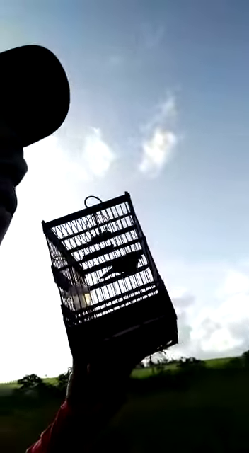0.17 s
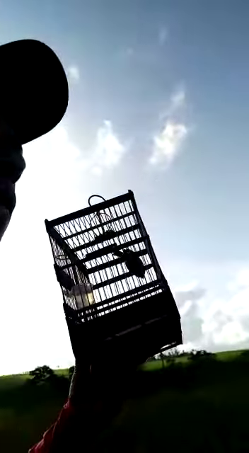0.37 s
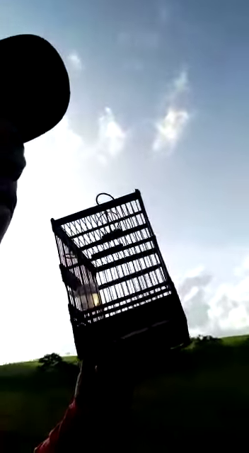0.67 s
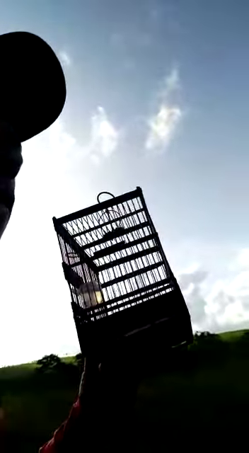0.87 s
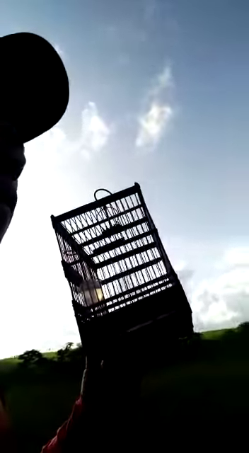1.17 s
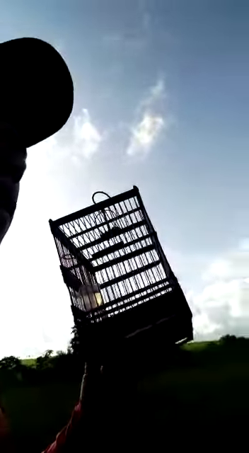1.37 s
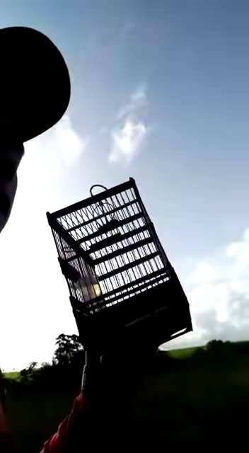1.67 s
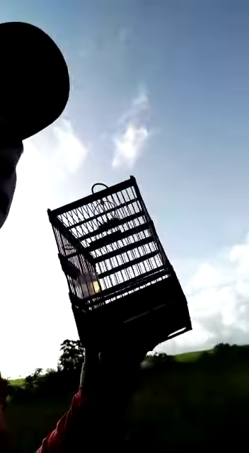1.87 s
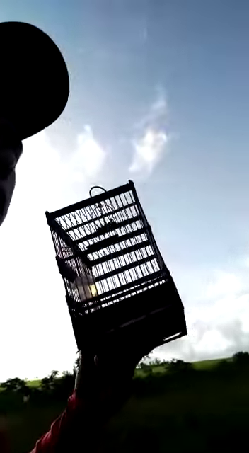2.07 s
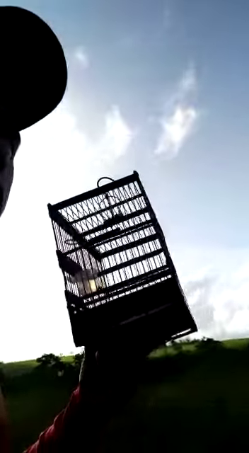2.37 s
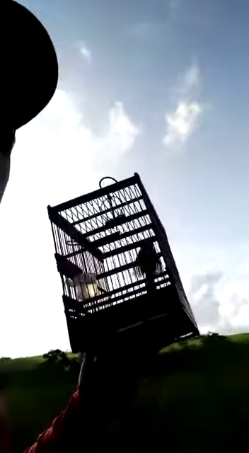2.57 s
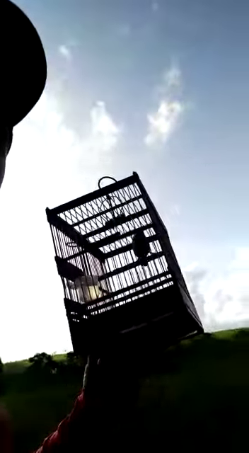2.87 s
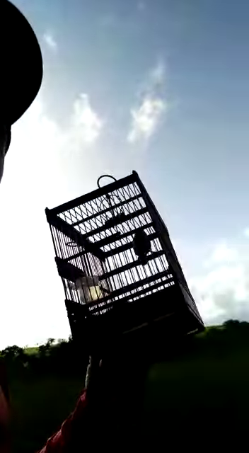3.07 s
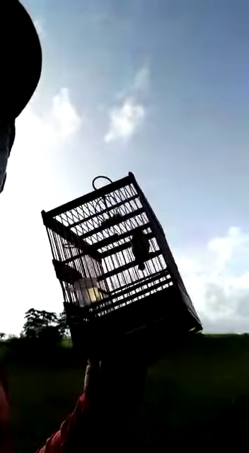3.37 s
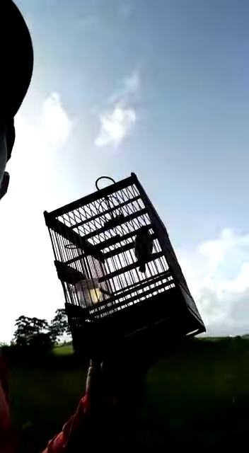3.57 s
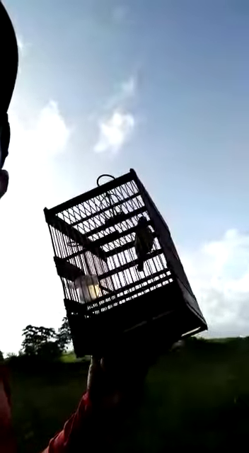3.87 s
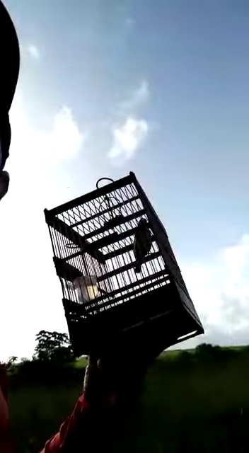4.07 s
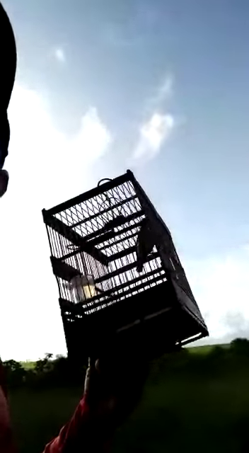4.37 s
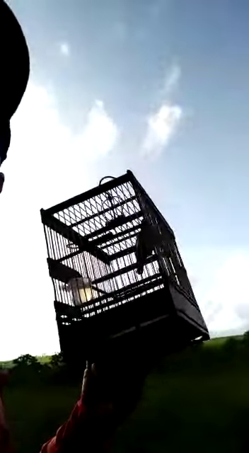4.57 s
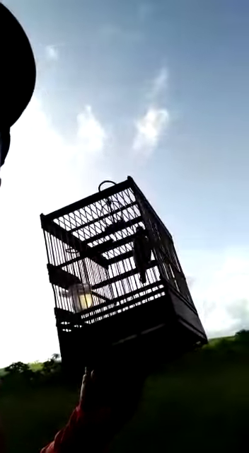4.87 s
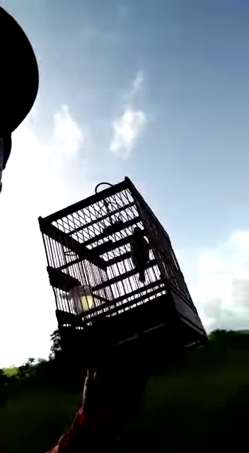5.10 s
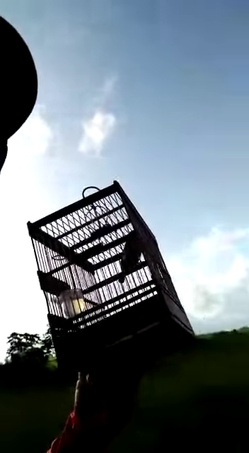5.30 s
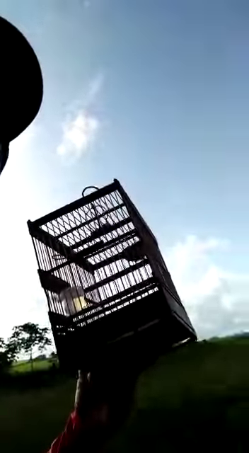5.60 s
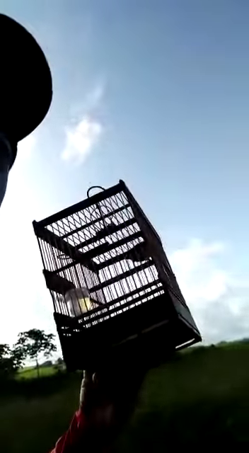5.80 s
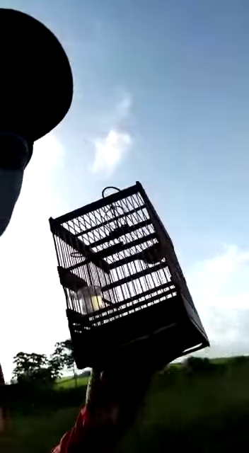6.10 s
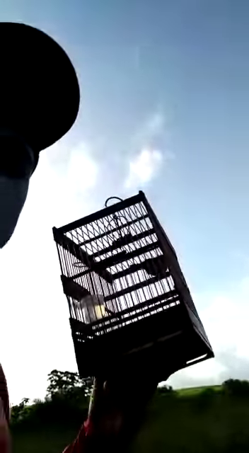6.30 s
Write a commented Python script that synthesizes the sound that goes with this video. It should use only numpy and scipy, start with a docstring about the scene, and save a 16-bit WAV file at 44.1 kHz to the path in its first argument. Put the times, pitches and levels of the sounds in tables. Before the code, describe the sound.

Someone carries a small wooden birdcage through grass in open air. Gentle irregular rustling, tiny stem cracks, low wind buffets and faint high insect chirps fill the first half. Then the bird, very near the microphone, sings five piercing pure whistles falling in pitch, far louder than everything else. Afterwards feathers flutter in quick soft beats, claws tick the cage, and a woody landing knock ends it.

```python
"""A meadow: a finch in a small wooden cage, carried close to a phone, whistles five notes that each end lower,
then flutters and lands. Whistles are gliding near-sines; claw blows ring decaying wood modes; wing beats are
air thumps with feather noise. Grass swishes as coloured noise under the carrier's steps and stalks snap as
short rings; wind puffs low noise on the microphone ports; crickets chirp as gliding tones over a far hiss."""
import sys
import numpy as np
from scipy import signal
from scipy.fft import rfft, irfft
from scipy.io import wavfile
from scipy.ndimage import uniform_filter1d

SR = 44100
rng = np.random.default_rng(int(sys.argv[2]) if len(sys.argv) > 2 else 0)


def natural_amplitude(level_db):
    """Convert a level in decibels to a linear amplitude factor, elementwise."""
    exponent = np.asarray(level_db, float) / 20
    return 10 ** exponent


def master(y):
    """Save y as 16-bit WAV."""
    cut = np.clip(np.atleast_2d(y).T, -1, 1)
    pcm = np.round(cut * 32767)  # scale
    wavfile.write(sys.argv[1], SR, pcm.astype(np.int16))


N = 284180


def curve(table):
    """Columns of a table whose first column is seconds, one value a sample."""
    s, *columns = np.transpose(table)
    return [np.interp(np.arange(N) / SR, s, c) for c in columns]


def pan(db):
    """Left and right gains for a left-minus-right level."""
    return natural_amplitude(np.array([db, -db]) / 2)


def noise(spectrum):
    """Noise of rms 1 with a colour given as (Hz, relative density in dB)."""
    hz, db = np.transpose(spectrum)
    log_hz = np.log(np.fft.rfftfreq(N, 1 / SR) + 1)
    gain = natural_amplitude(np.interp(log_hz, np.log(hz), db, -80, -80))
    x = irfft(rfft(rng.standard_normal(N)) * gain, N)
    return x / x.std()


def walk(rate_hz):
    """Random levels held 1 / rate_hz seconds and slewed twice; spread near 1."""
    hold = int(SR / rate_hz)
    steps = np.repeat(rng.standard_normal(N // hold + 1), hold)
    return 1.15 * uniform_filter1d(uniform_filter1d(steps, hold), hold)[:N]


def ring(hz, t60_s, length_s=.08):
    """One mode, decaying 60 dB in t60_s."""
    t = np.arange(int(length_s * SR)) / SR
    return np.sin(2 * np.pi * hz * t) * np.exp(-np.log(1000) * t / t60_s)


def bell(s, half_s):
    """Gaussian bump of height 1 at s, down to 1 / e half_s away."""
    return np.exp(-((np.arange(N) / SR - s) / half_s) ** 2)


def swell(s, rise_s, fall_s):
    """A bell-shaped rise to time s, then an exponential fall."""
    t = np.arange(N) / SR - s
    return np.where(t < 0, np.exp(-(t / rise_s) ** 2), np.exp(-np.maximum(t, 0) / fall_s))


def add(out, s, sound):
    """Mixes a short stereo sound in at time s."""
    i = int(s * SR)
    sound = sound[:, :N - i]
    out[:, i:i + sound.shape[1]] += sound


def ports(make, alike):
    """Partly alike left and right; the shared part arrives later on the right."""
    lag_samples = 18
    shared = make()
    alike = np.clip(alike, 0, 1)
    pair = (shared, np.roll(shared, lag_samples))
    return np.array([np.sqrt(alike) * x + np.sqrt(1 - alike) * make() for x in pair])


def song():
    """Near-sine whistles with faint overtones; an unsteady quick warble roughens the fast slides."""
    # One list a voice entry, two overlap in the first note. Each row: time in seconds, pitch in Hz,
    # rms level on the right in dB.
    notes = [
        [(3.785, 4560, -56), (3.792, 4430, -48), (3.808, 4440, -40), (3.849, 4270, -24.5), (3.862, 4080, -22),
         (3.873, 3650, -23), (3.878, 3500, -40)],
        [(3.869, 4800, -40), (3.874, 4550, -27), (3.881, 4130, -24.5), (3.892, 4120, -27), (3.916, 3940, -22.6),
         (3.968, 3840, -19), (4.018, 3840, -15.3), (4.092, 3640, -13.8), (4.107, 3580, -18.7),
         (4.115, 3630, -31.5)],
        [(4.226, 4660, -42), (4.231, 4850, -33.5), (4.239, 5660, -27), (4.247, 5880, -26.3), (4.267, 5720, -22),
         (4.31, 5690, -16.5), (4.353, 5570, -15), (4.362, 5240, -16.8), (4.373, 5200, -16),
         (4.381, 4910, -13.5), (4.389, 4890, -14.2), (4.395, 4620, -14.4), (4.404, 4620, -13.5),
         (4.411, 4310, -19), (4.429, 4150, -16.3), (4.455, 4040, -17.4), (4.481, 4040, -18.4),
         (4.489, 4090, -22.7), (4.494, 4150, -33.6)],
        [(4.63, 4900, -42), (4.64, 4710, -26), (4.653, 4430, -18.6), (4.678, 4080, -14), (4.692, 3890, -16.3),
         (4.712, 3630, -13.5), (4.76, 3270, -14), (4.78, 3140, -16), (4.847, 3010, -20.8), (4.859, 2950, -27.6),
         (4.866, 2900, -42)],
        [(4.918, 4410, -39), (4.925, 4530, -25), (4.942, 4450, -14.6), (4.964, 4180, -13.6),
         (4.987, 3940, -15.7), (5.022, 3650, -13.8), (5.063, 3400, -13.7), (5.121, 3390, -15),
         (5.128, 3340, -20), (5.132, 3520, -32.6)],
        [(5.205, 5930, -44), (5.215, 5830, -30.4), (5.23, 5670, -23.5), (5.248, 5750, -20.3),
         (5.272, 5460, -23), (5.283, 5890, -16.5), (5.291, 5480, -22), (5.314, 5300, -18.5), (5.323, 4950, -16),
         (5.345, 4540, -13.8), (5.359, 4220, -17.6), (5.385, 4100, -14.4), (5.411, 4090, -17.4),
         (5.419, 4180, -23), (5.423, 4180, -36.4)],
    ]
    # How the bird faces, a row a voice entry: left minus right in dB, overtone level in dB.
    facing = [(-7, -6), (-10, -6), (-0.5, -4.5), (-1.5, -2.5), (-0.5, 0), (3.5, 0)]
    # The hand shades the left port by pitch. Each row: pitch in Hz, left minus right in dB.
    left_shade = [(2950, -14), (3100, -19), (3420, -29.5), (3640, -15), (3920, -9.5), (4150, -5.5),
                  (4450, -12.5), (4800, -15), (5200, -8.5), (5600, -4), (5900, -12.5)]
    # The left port hears the bird round the hand. Each row: pitch in Hz, left phase lead in radians.
    left_lead = [(3000, 2.9), (3450, 1.5), (3800, -.4), (4400, -1.6), (5200, -.6), (5800, -1.7)]
    # Multiples 2, 3, 4 at full effort. Each row: right level in dB, left level in dB.
    overtones = [(-58, -66), (-59, -67), (-72, -77)]
    # Buzzes on the fast slides. Each row: middle in seconds, half length in seconds, warble in Hz rms.
    buzzes = [(4.37, .036, 180.3), (5.254, .03, 50.2), (5.306, 0.028, 242)]
    # Hoarse cracks of the voice. Each row: middle in seconds, half length in seconds, level in dB.
    rasps = [(3.873, .002, -47), (4.231, .006, -44), (5.131, .003, -50)]
    # Echoes off cage, carrier and ground. Each row: delay in seconds, level in dB.
    echoes = [(.0021, -26), (.0046, -28), (.0075, -31), (.0155, -34), (.023, -41), (.031, -44), (.043, -47)]
    calm_warble_hz, quiet_warble_hz_per_db = 8, 0.1  # warble widens slightly as the level falls
    fade_total_s = 0.0045

    out = np.zeros((2, N))
    wobble = noise([(60, -10), (150, -6), (273, 0), (443, -12)])
    flutter = noise([(50, 0), (120, 0), (500, -10)])
    air = noise([(8000, -15.0), (9500, -1.5), (12000, -1), (15000, -3.5)])
    buzz_hz = sum(hz * bell(s, half_s) for s, half_s, hz in buzzes)
    for note, (turn_db, bright_db) in zip(notes, facing):
        span = slice(int(note[0][0] * SR), int(note[-1][0] * SR))
        hz, db = (c[span] for c in curve(note))
        pan_db = turn_db + np.interp(hz, *np.transpose(left_shade))
        lead_rad = np.interp(hz, *np.transpose(left_lead))
        warble_hz = calm_warble_hz + buzz_hz[span] - quiet_warble_hz_per_db * (db - db.max())
        swing_hz = 1.6 * warble_hz * np.tanh(.8 * wobble[span])  # the swing has a limit
        phase = 2 * np.pi * np.cumsum(hz + swing_hz) / SR
        # cage and hand colour each path: a pitch swing also swings the level, oppositely at the two ports
        left_swing = 1 + .7 * np.tanh(.002 * swing_hz + .003 * warble_hz * flutter[span])
        right_swing = 1 + .5 * np.tanh(-.0012 * swing_hz + .003 * warble_hz * flutter[::-1][span])
        left = natural_amplitude(db + pan_db) * left_swing * np.sin(phase + lead_rad)
        right = natural_amplitude(db) * right_swing * np.sin(phase)
        for k, (right_db, left_db) in enumerate(overtones, 2):
            # overtones grow slowly with effort, waver, and the beak passes less between 9 and 12 kHz
            beak_db = np.interp(k * hz, [6500, 8500, 10000, 11500, 12500, 15500, 16000],
                                [7, 0, -4, -5, 2, 4, -60])
            overtone = natural_amplitude(.4 * (db + 14) + bright_db + beak_db + 2.5 * walk(30)[span])
            right += overtone * natural_amplitude(right_db) * np.sin(k * phase)
            left += overtone * natural_amplitude(left_db) * np.sin(k * phase + k)
        # air through the beak hisses faintly with the note
        right += natural_amplitude(0.52 * db - 70) * air[span]
        left += natural_amplitude(1.1 * db - 71) * air[::-1][span]
        fade = signal.windows.tukey(len(hz), fade_total_s * SR / len(hz))
        out[:, span] += np.sqrt(2) * fade * np.array([left, right])  # sqrt(2): rms to peak

    rasp = sum(natural_amplitude(db) * bell(s, half_s) for s, half_s, db in rasps)
    rasp = rasp * noise([(2600, -13.5), (3400, 1), (6500, -6.5), (7800, -17)])
    out += natural_amplitude(np.array([[-8], [0]])) * rasp
    echo = sum(natural_amplitude(db) * np.roll(out[1], int(s * SR)) for s, db in echoes)
    return out + echo * np.array([[natural_amplitude(-14.0)], [1]])


def cage():
    """A claw blow rings the wooden frame: low modes are the floor panel, high ones the perch; wires tick."""
    # Claws on wood. Each row: start in seconds, panel, perch and wire tick drive in dB, left minus right in dB.
    knocks = [(5.2199, -39.5, -22, -27, 31), (5.2297, -37.5, -70, -86, 20), (5.284, -39, -29.5, -62.5, 10),
              (5.359, -43, -74, -86.5, 9), (5.759, -49, -34.5, -77, 21), (6.3078, -23.5, -10, -82, 16)]
    # Each row: mode in Hz, relative level in dB, t60 in seconds.
    modes = [(370, 0, .022), (738, -3, .012), (1410, -15, .007), (2500, 0, .008), (3300, -7, .004)]
    tick_decay_s, right_lag_samples = 0.00086, 8
    out = np.zeros((2, N))
    contact = np.convolve(np.hanning(13), np.hanning(13)) / 20  # a soft push of .5 ms
    tick_band = signal.butter(1, [2500, 6000], "band", fs=SR, output="sos")
    for s, panel_db, perch_db, tick_db, pan_db in knocks:
        blow = sum(natural_amplitude(db + (perch_db if hz > 1000 else panel_db)) * ring(hz, t60_s)
                   for hz, db, t60_s in modes)
        tick = signal.sosfilt(tick_band, rng.standard_normal(len(blow)))
        tick *= np.exp(-np.arange(len(blow)) / (tick_decay_s * SR))
        left = np.convolve(blow, contact)[:len(blow)] + natural_amplitude(tick_db) * tick
        right = natural_amplitude(-pan_db) * np.roll(left, right_lag_samples)
        add(out, s, np.array([left, right]))
    # a small box radiates little deep bass
    return signal.sosfilt(signal.butter(1, 170, "high", fs=SR, output="sos"), out)


def wings():
    """Each beat pushes a soft thump of air and a swish of feathers, a little uneven."""
    # Flurries. Each row: first beat in seconds, beats (rounded down), thump and feather swish drive in dB.
    flurries = [(5.655, 5.4, -55, -58.5), (5.852, 4, -55.5, -57), (6.055, 3, -44.5, -57.5)]
    beat_s, pan_db = .038, 13
    out, t = np.zeros((2, N)), np.arange(int(.04 * SR)) / SR
    feathers = noise([(600, 9), (1300, -2.5), (2700, 5), (5000, -14)])
    thump = np.sin(2 * np.pi * 300 * t) * t / 0.0017 * np.exp(1 - t / 0.0019)
    swish_shape = t / .0045 * np.exp(1 - t / .0045)
    for first_s, beats, thump_db, swish_db in flurries:
        for k, uneven in enumerate(rng.standard_normal((int(beats), 3))):
            s = first_s + k * beat_s + .0015 * uneven[2]
            swish = feathers[int(s * SR):][:len(t)] * swish_shape
            beat = natural_amplitude(thump_db + 0.83 * uneven[0]) * thump + natural_amplitude(swish_db + 1.4 * uneven[1]) * swish
            add(out, s, np.outer(pan(pan_db), beat))
    return out


def grass():
    """Blades swish and crackle with each step; dry stems brush past and the loudest stalks snap singly."""
    # Each row: step in seconds, swish in dB ahead of grain and waver, low rustle in dB ahead of waver.
    steps = [(0.0, -56.5, -59.5), (0.28, -62.5, -66), (0.82, -66.5, -71.5), (0.97, -61, -76.5),
             (1.118, -57.5, -66), (1.358, -62, -68), (1.822, -61.5, -66.5), (2.112, -58, -61),
             (2.45, -68.5, -72.5), (2.72, -85, -73.5), (2.952, -63, -71.5), (3.228, -59.5, -68.5),
             (3.922, -68, -65), (4.14, -60, -61.5), (4.551, -68, -74.5), (4.88, -61.5, -63.5),
             (5.2, -60, -77.5), (5.38, -57.5, -60), (5.55, -65, -66.5), (5.78, -63, -66.5),
             (5.951, -57.5, -61.5), (6.398, -63.5, -58.5)]
    # Colours. Each row: Hz, relative density in dB.
    swish_colour = [(700, -24), (900, -4.5), (1200, -2.5), (1750, -2.5), (2700, -1.5), (3700, -1),
                    (4700, -9), (6000, -9), (7500, -21), (8200, -41)]
    rustle_colour = [(120, -38), (200, -15.5), (292, -3), (464, -0.5), (787, -1.5), (1100, -22),
                     (1430, -53.5), (2420, -120)]
    # Dry stems brushing past. Each row: middle in seconds, half length in seconds, level in dB ahead of grain.
    brushes = [(0.045, .05, -61), (1.094, .06, -74), (2.97, .035, -62), (3.208, .03, -64.5),
               (4.138, .02, -61), (4.888, .03, -64), (5.773, .03, -73.5), (6.083, .05, -62.5)]
    # Stalks snapping, plus a click as the bird's note ends near 4.49 s. Each row: time in seconds, drive in dB,
    # main mode in Hz, left minus right in dB.
    snaps = [(0.0598, -40, 3000, -10), (0.2876, -46, 2030, 4), (0.6401, -47.5, 2400, -2),
             (0.6803, -42, 3040, -11), (0.7146, -50, 1760, 3.5), (0.9728, -41, 1960, 5),
             (1.09, -44, 2000, 0), (2.9182, -40, 3050, -2), (2.9796, -38, 3050, -1.5),
             (3.308, -41.5, 2500, -0.5), (3.3827, -51, 1910, 9), (3.5339, -42, 2520, -1),
             (4.162, -42, 4400, -1), (4.4887, -44.5, 3300, -10.5)]
    rise_s, fall_s, still_swish_db, still_rustle_db = .12, 0.2, -80, -79.5

    shapes = [swell(s, rise_s, fall_s) for s, _, _ in steps]
    swish_steps = [natural_amplitude(db) * shape for (_, db, _), shape in zip(steps, shapes)]
    rustle_steps = [natural_amplitude(db) * shape for (_, _, db), shape in zip(steps, shapes)]
    swish = natural_amplitude(still_swish_db) + np.max(swish_steps, axis=0)
    rustle = natural_amplitude(still_rustle_db) + np.max(rustle_steps, axis=0)
    # sparse larger grains on top of the dense swish
    grain_db = 3.5 * np.minimum(rng.exponential(size=N // 64 + 1), 5)
    grain = uniform_filter1d(natural_amplitude(grain_db).repeat(64)[:N], 64)
    grain = 0.8 + 0.85 * grain / np.sqrt(np.mean(grain ** 2))
    out = swish * natural_amplitude(2.0 * walk(25)) * grain * ports(lambda: noise(swish_colour), 0.74)
    out += rustle * natural_amplitude(2.0 * walk(6.6)) * ports(lambda: noise(rustle_colour), 0.66)

    brush = sum(natural_amplitude(db) * bell(s, half_s) for s, half_s, db in brushes)
    brush_colour = [(2500, -12.5), (4000, 4), (8000, -6.0), (15700, -14.5)]
    out += brush * grain * ports(lambda: noise(brush_colour), 0.44)
    for s, db, hz, pan_db in snaps:
        stalk = ring(hz, 0.005, .02) + 0.25 * ring(0.65 * hz, 0.004, .02)
        snap = np.convolve(stalk, np.hanning(7) / 3)  # softened onset
        add(out, s + 0.0018, natural_amplitude(db) * np.outer(pan(pan_db), snap))
    return out


def wind():
    """Turbulent puffs, mostly unrelated at the two ports, swell with each gust; eddies pop on the right."""
    # Each row: peak in seconds, level in dB ahead of flutter, fall time constant in seconds,
    # left minus right in dB.
    gusts = [(0.11, -68.5, 0.27, -20), (0.7, -65.5, 0.52, -5), (1.13, -65.5, 0.18, -5),
             (1.96, -55.5, .08, -14), (2.08, -58, .2, -9), (2.42, -59.5, 0.13, -8.5),
             (2.74, -62.5, 0.18, -9), (3.14, -59.5, .4, -7), (4.271, -63.5, 0.067, -16.5),
             (4.55, -67, .3, -3), (4.95, -66, 0.83, 0), (5.56, -58.5, .1, -16), (5.68, -62, .3, -5.5),
             (6.1, -56, 0.12, 8), (6.3, -55.5, 0.071, -4)]
    # Puff colour. Each row: Hz, relative density in dB.
    puff_colour = [(15, -42), (25, -19.5), (60, -0.5), (86, 2), (154, -3.5), (300, -14), (390, -39.5),
                   (660, -120)]
    # Single eddies. Each row: start in seconds, peak in dB, Hz.
    pops = [(3.141, -28.5, 147), (.098, -37, 44)]
    rise_s, breeze_db, breeze_pan_db = .05, -72, 5
    level = natural_amplitude(breeze_db) * pan(breeze_pan_db)[:, None]
    for s, db, fall_s, pan_db in gusts:
        level = np.maximum(level, natural_amplitude(db) * np.outer(pan(pan_db), swell(s, rise_s, fall_s)))
    flutter_db = np.array([3.0 * walk(20), 3.2 * walk(14)])
    out = level * natural_amplitude(flutter_db) * ports(lambda: noise(puff_colour), 0.25)
    t = np.arange(int(0.014 * SR)) / SR
    for s, db, hz in pops:
        pop = np.hanning(len(t)) * np.cos(2 * np.pi * hz * (t - .008))
        add(out, s, natural_amplitude(db) * np.outer([0, 1], pop))
    return out


def crickets():
    """Chirps that slide down some 500 Hz; fainter ones run on in small groups, about twenty a second."""
    # Groups. Each row: first chirp in seconds, chirps (rounded down), peak in dB ahead of pan, mid-chirp Hz.
    groups = [(0.267, 2.4, -64.5, 5640), (0.47, 3.5, -72, 5500), (0.876, 2.12, -63.5, 5660),
              (1.08, 3, -69, 5880), (1.384, 2.3, -64.5, 5650), (1.473, 1.84, -67, 5420),
              (1.77, 2, -69.5, 5800), (2.064, 3, -72, 5620), (2.288, 3.1, -66, 5800), (2.75, 3, -80, 5700),
              (3.3, 2.6, -71, 5550), (3.425, 2.6, -74, 5800), (3.675, 3, -82, 5750), (6.148, 2, -66, 5650)]
    gap_s, far_db, pan_db = .051, -72, -14.5
    out, t = np.zeros((2, N)), np.arange(int(0.026 * SR)) / SR
    chirps = [(s + k * gap_s, db, hz) for s, count, db, hz in groups for k in range(int(count))]
    for k, (a, b, c) in enumerate(rng.standard_normal((125, 3))):
        weak_db = 5 * (k % 5 > 2)  # two of every five are weaker
        chirps.append((.05 * k + .02 + .006 * a, far_db + 3 * b - weak_db, 5650 + 150 * c))
    for s, db, hz in chirps:
        chirp = np.hanning(len(t)) * np.sin(2 * np.pi * ((hz + 260) * t - 10000 * t ** 2))
        add(out, max(s - .007, 0), natural_amplitude(db) * np.outer(pan(pan_db), chirp))
    return out


def meadow():
    """Smooth far hiss of leaves and insects: coloured noise, slowly wavering."""
    # Each row: Hz, relative density in dB.
    hiss_colour = [(900, -2), (2700, -2), (5800, -4), (7500, -12), (8200, -14), (15700, -14)]
    hiss_db = -68.5 + 1.0 * walk(4.5)
    return natural_amplitude(hiss_db) * ports(lambda: noise(hiss_colour), 0.096)


def scene():
    """Bird and cage in front, meadow around."""
    return song() + cage() + wings() + grass() + meadow() + wind() + crickets()


def roll_off(x):
    """The treble ends steeply here."""
    return signal.sosfilt(signal.butter(12, 15750, fs=SR, output="sos"), x)


def record(dry):
    """The microphone drops the lowest bass, below 45 Hz."""
    mix = signal.sosfilt(signal.butter(2, 45, "high", fs=SR, output="sos"), dry)
    return roll_off(mix)


dry = scene()
out = record(dry)
master(out)
```